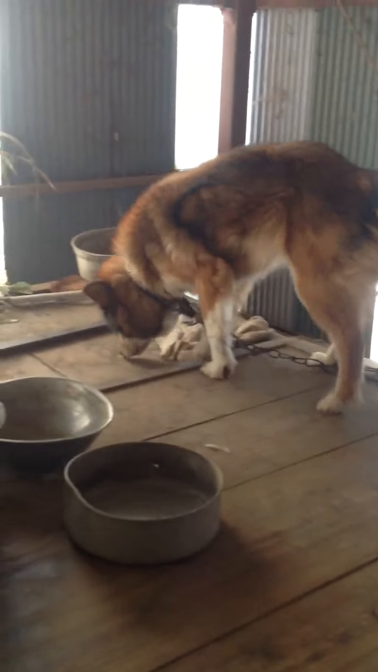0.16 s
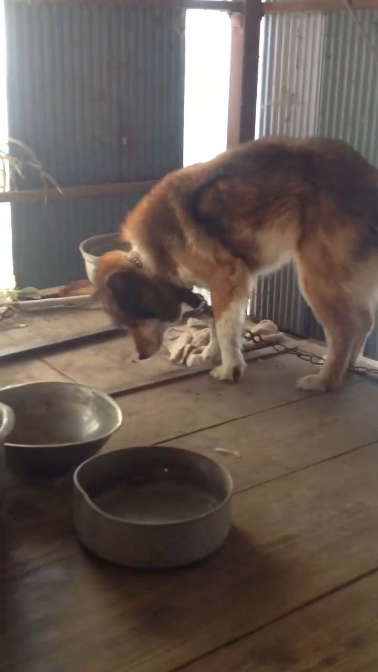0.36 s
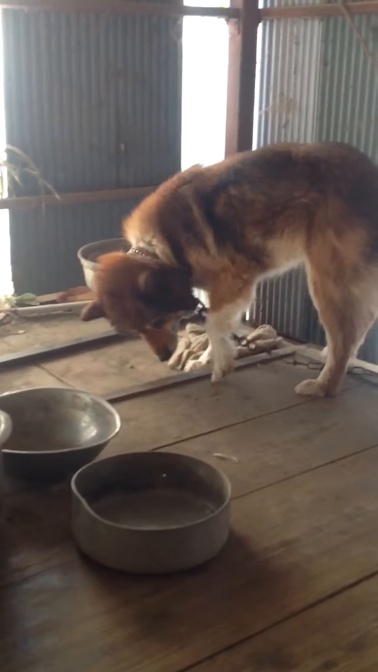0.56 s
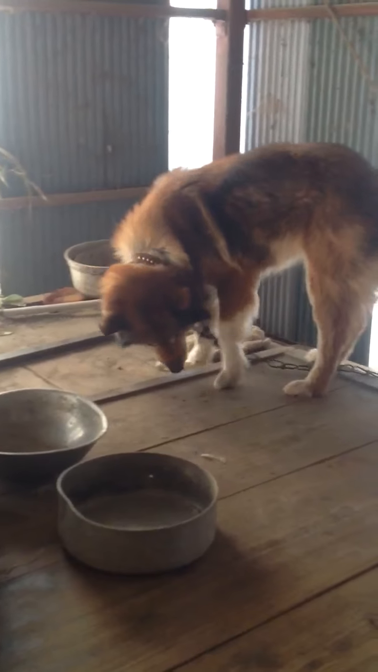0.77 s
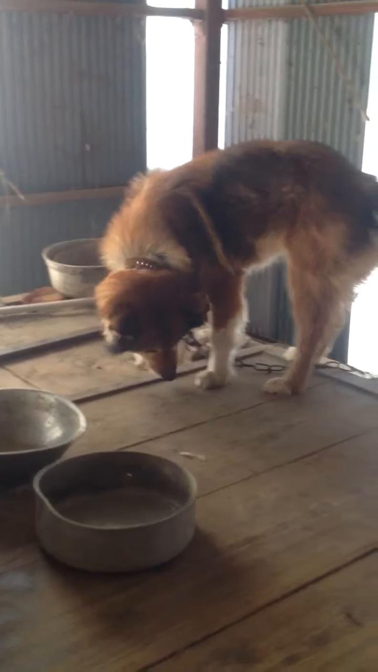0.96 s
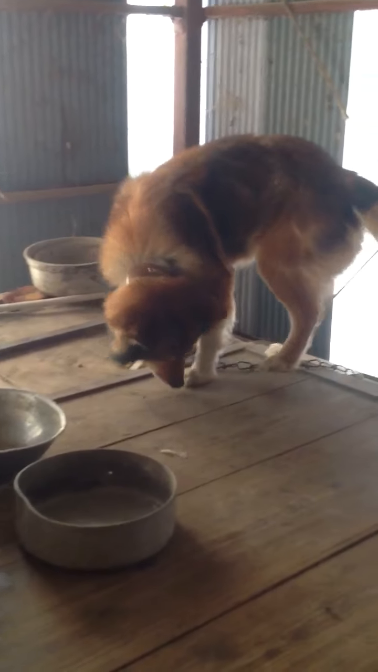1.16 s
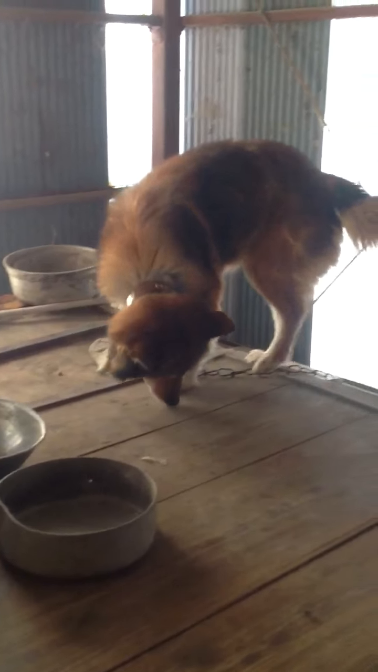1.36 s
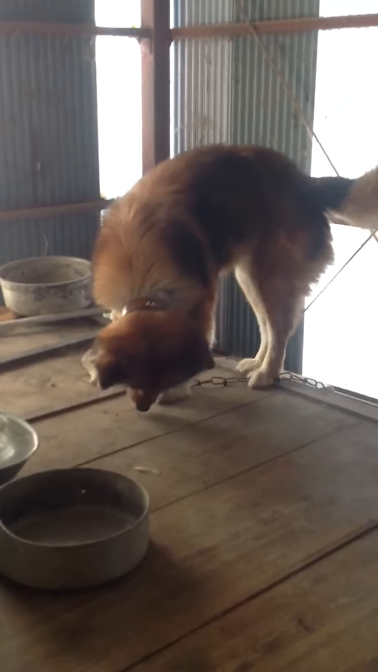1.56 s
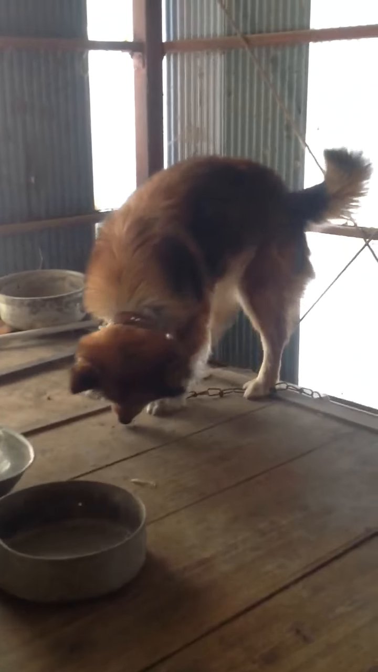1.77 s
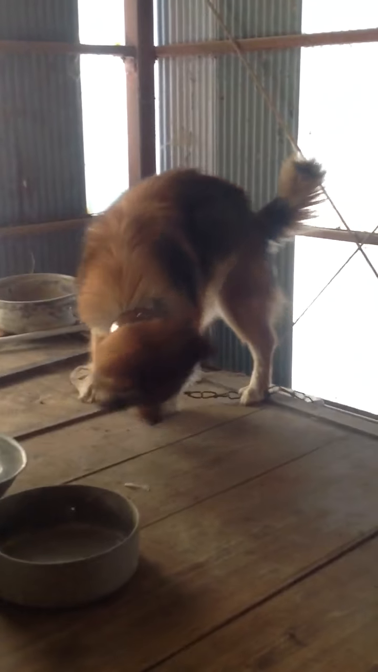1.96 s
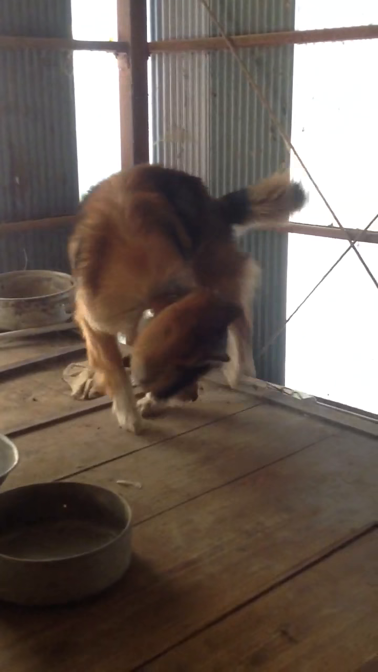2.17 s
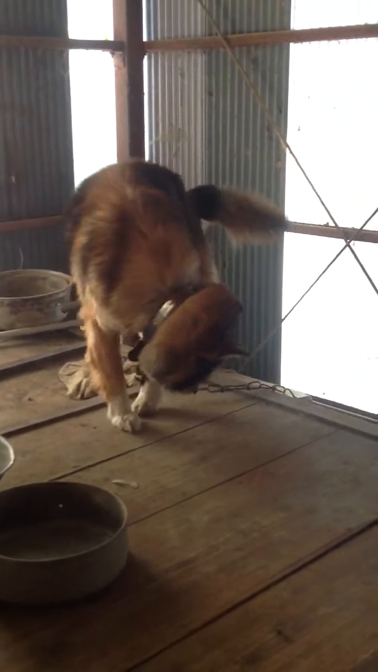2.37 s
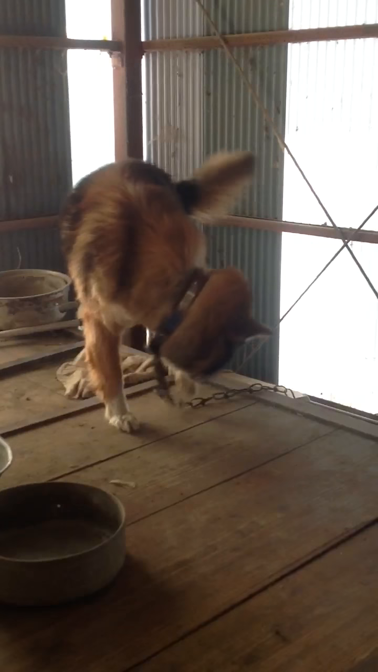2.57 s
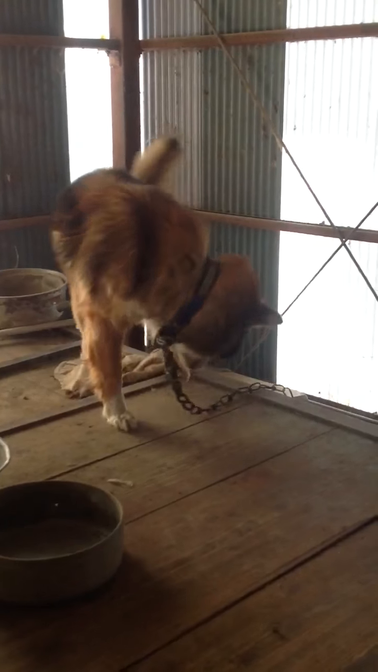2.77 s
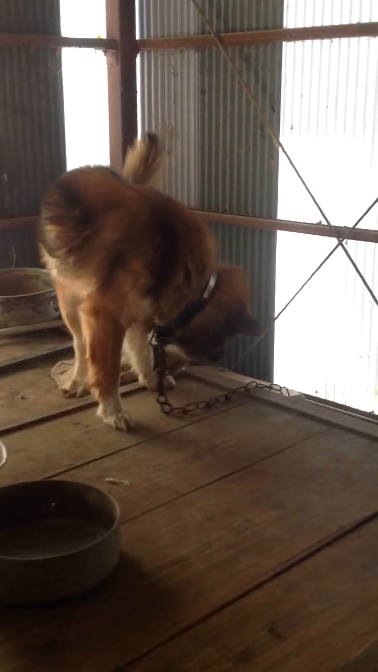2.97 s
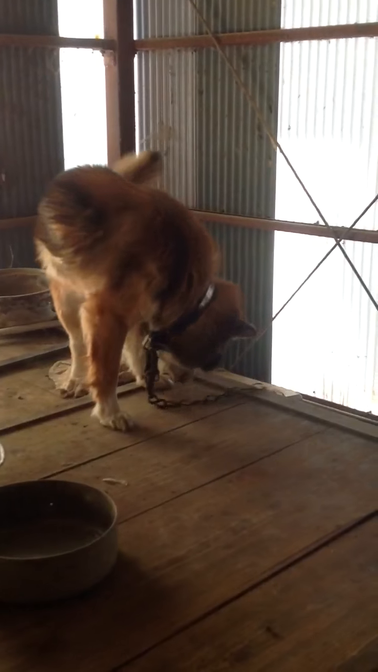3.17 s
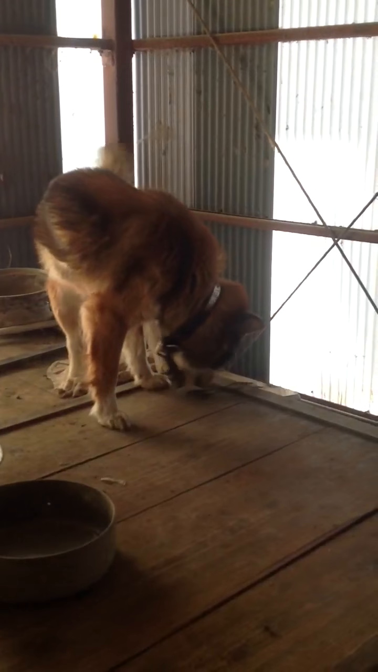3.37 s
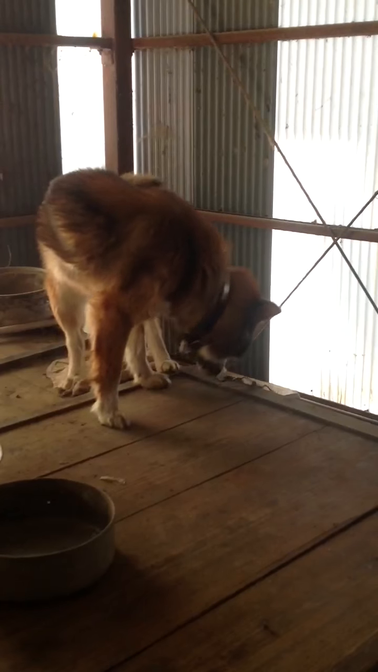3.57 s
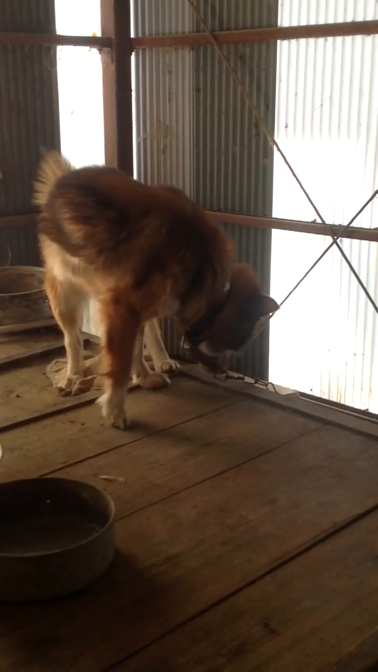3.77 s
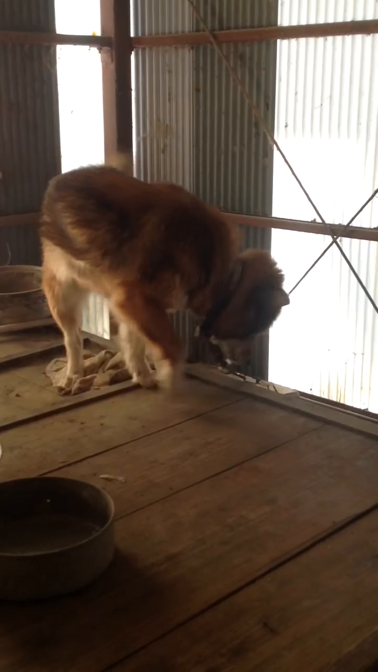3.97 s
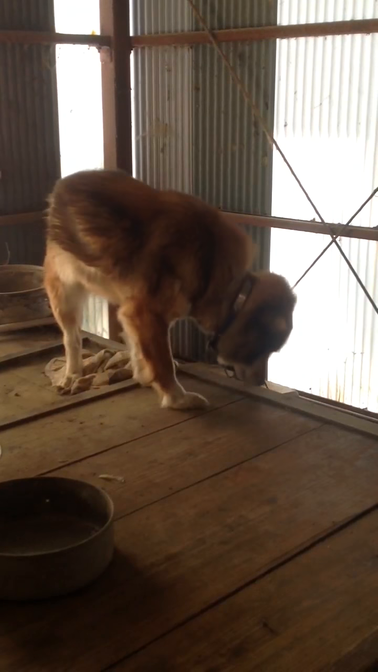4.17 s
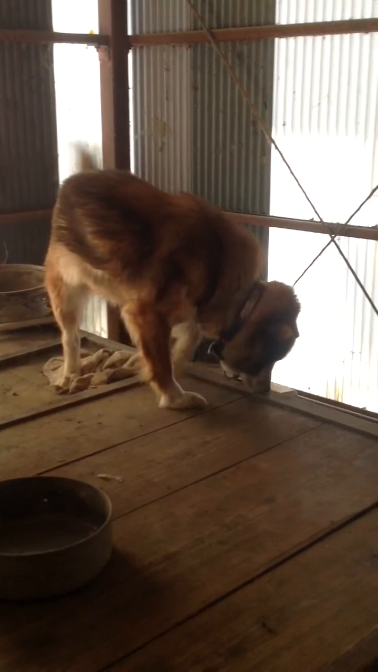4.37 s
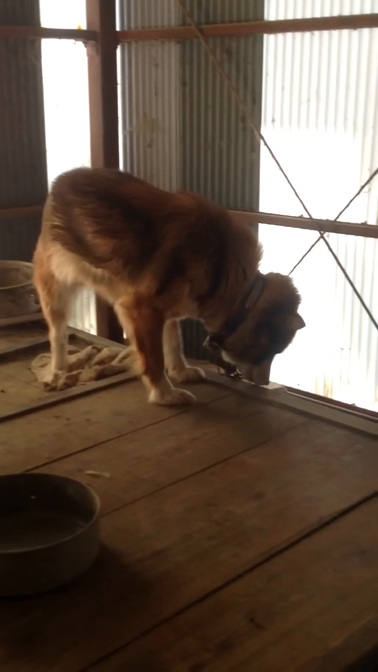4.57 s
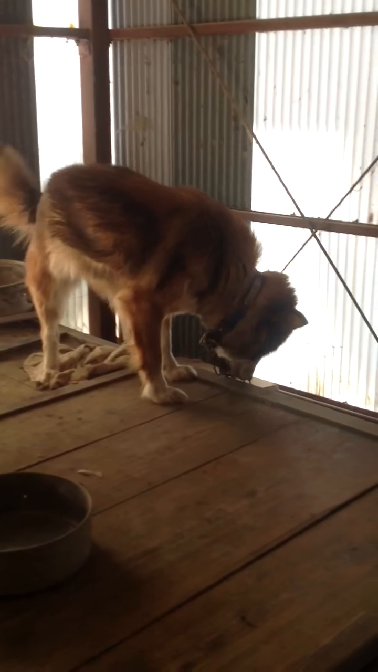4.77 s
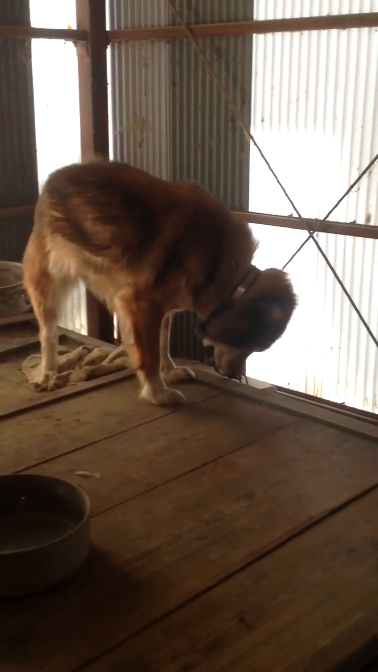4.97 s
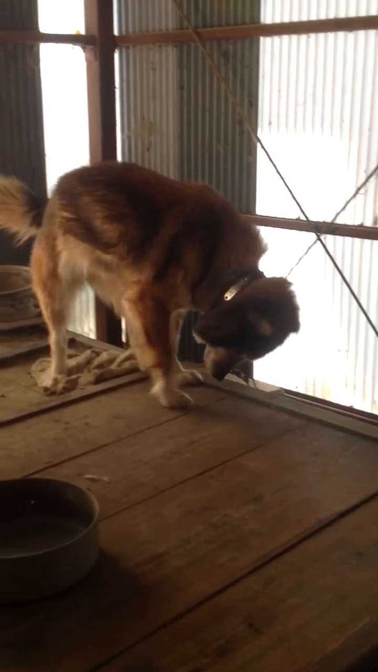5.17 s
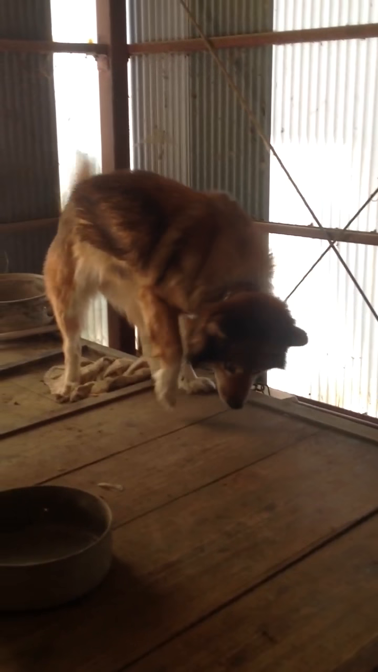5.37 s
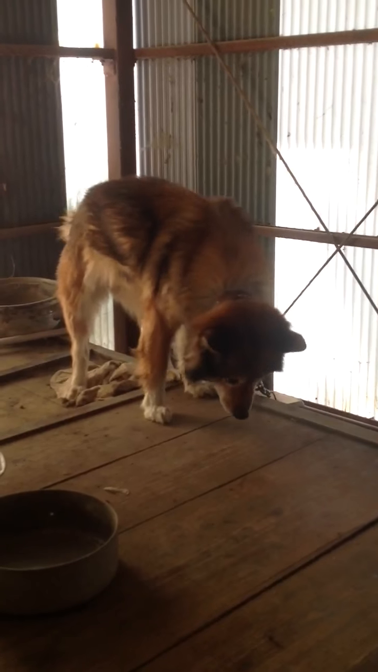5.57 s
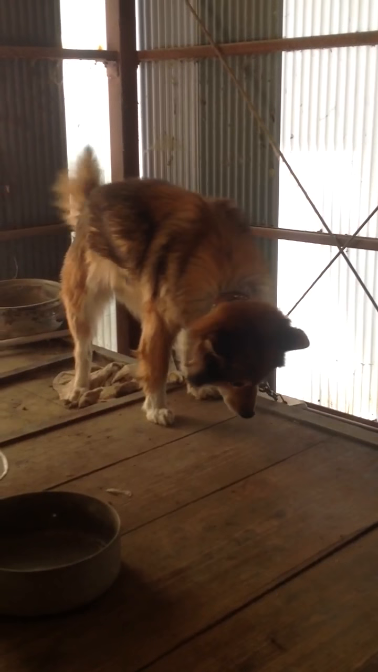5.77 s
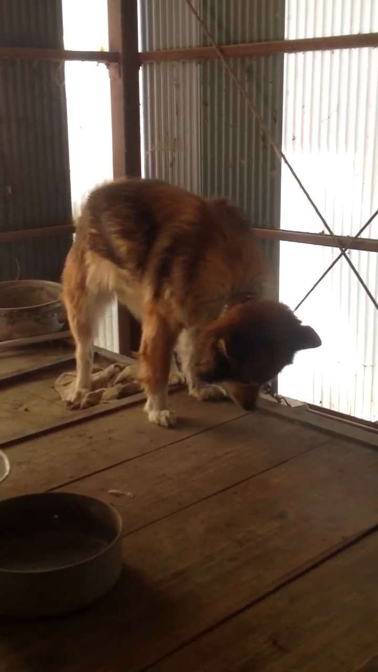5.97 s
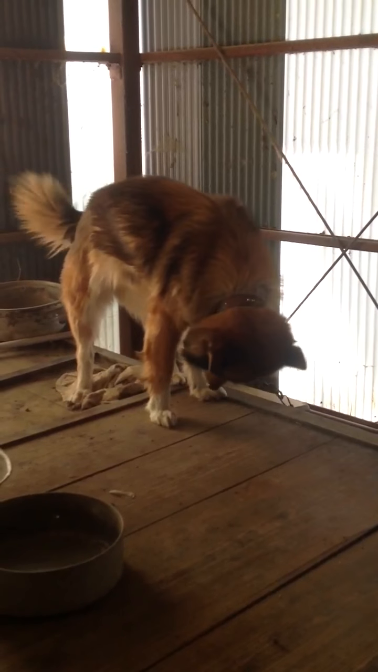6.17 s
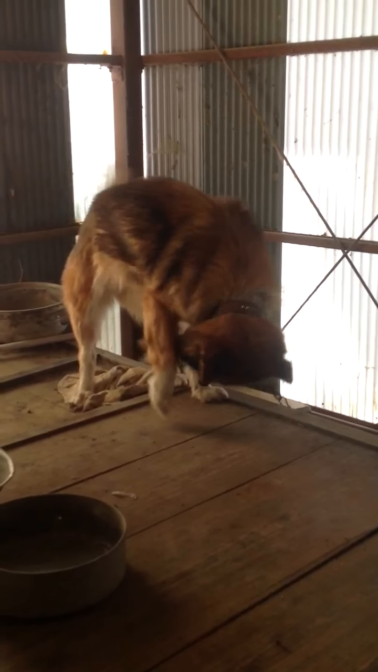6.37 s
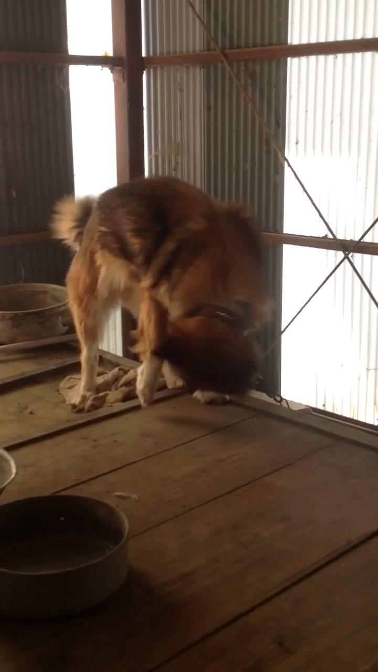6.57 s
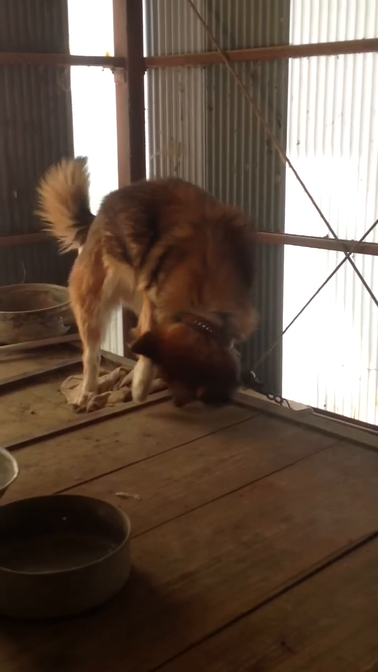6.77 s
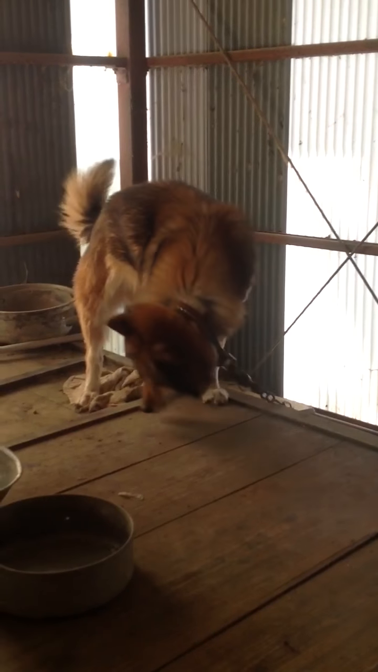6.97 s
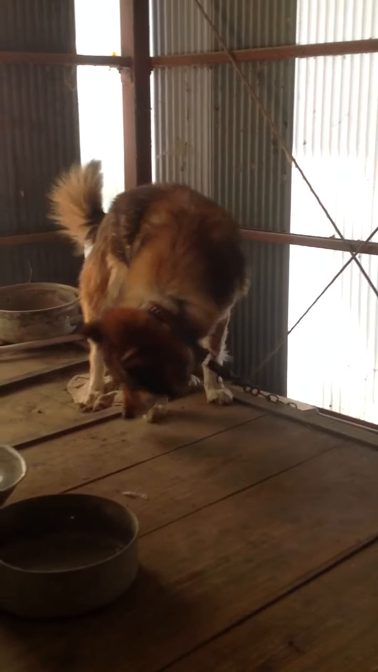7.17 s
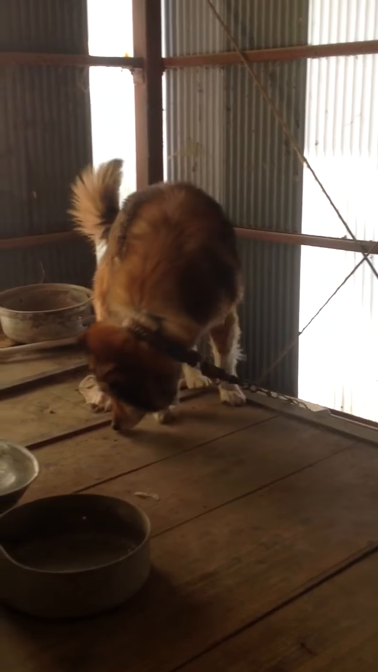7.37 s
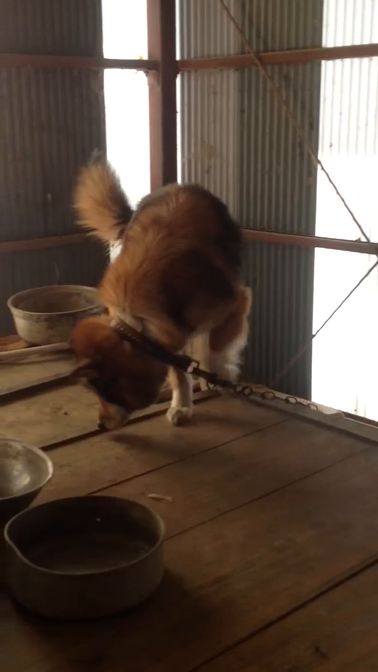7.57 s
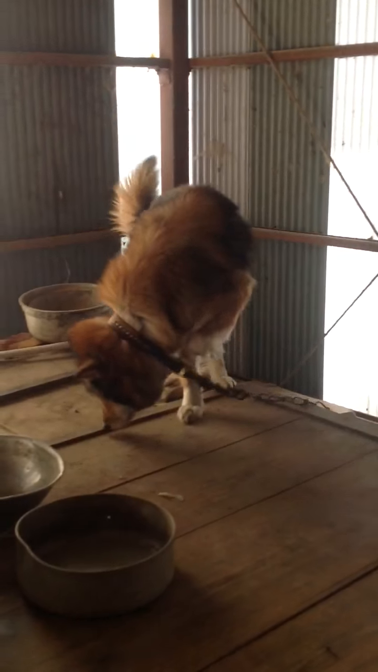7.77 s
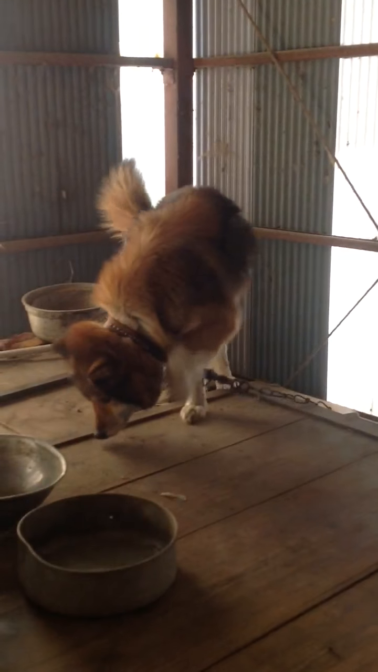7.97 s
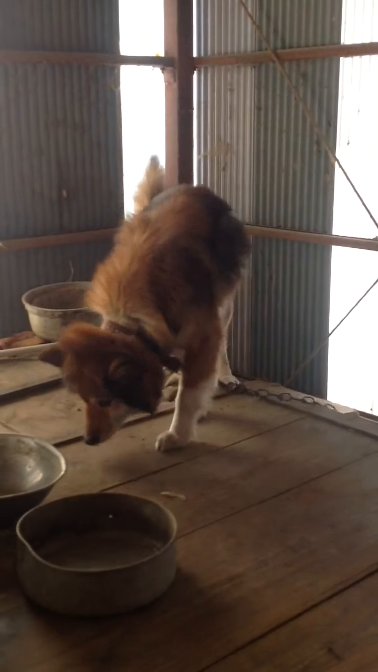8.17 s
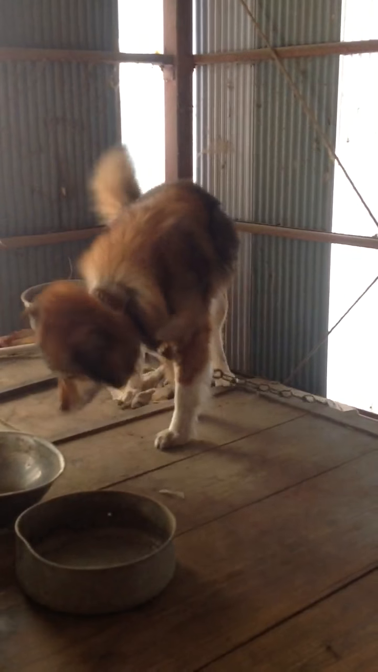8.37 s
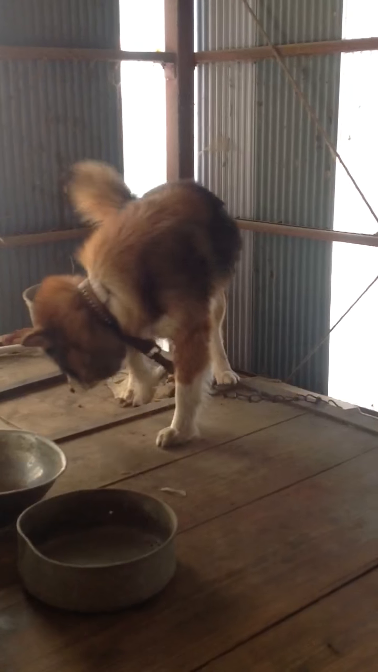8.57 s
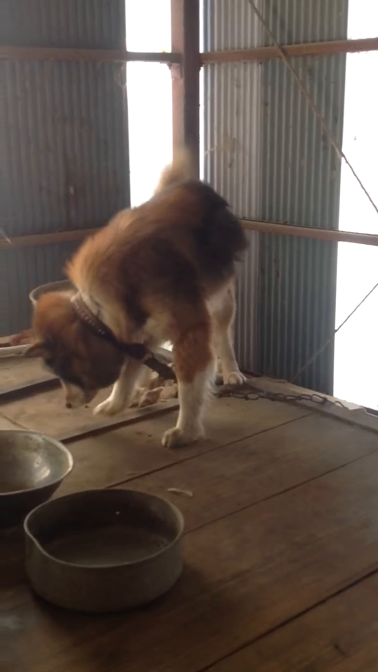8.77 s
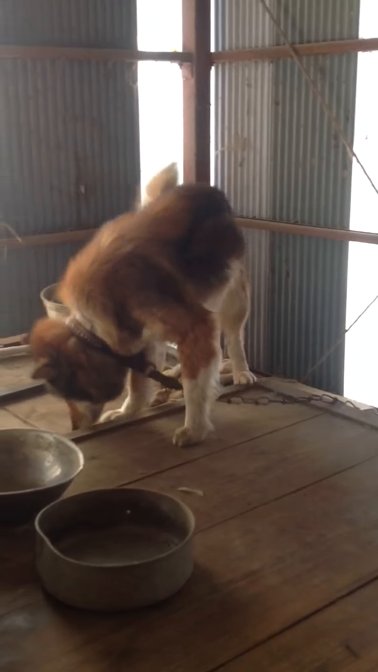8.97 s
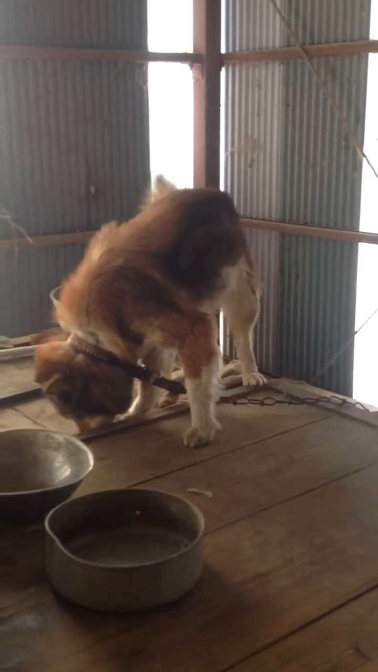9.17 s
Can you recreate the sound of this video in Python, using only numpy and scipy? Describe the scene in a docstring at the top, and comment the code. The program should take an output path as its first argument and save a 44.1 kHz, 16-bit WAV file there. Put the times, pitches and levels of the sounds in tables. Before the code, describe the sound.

A metal chain drags, clinks and knocks over hollow wooden planks in uneven bursts as a dog noses about a tin shed.

```python
"""On the plank floor of a tin shed, a chained dog noses and paws about above a low outdoor rumble.
Slack chain drags in bursts: random contacts shaped into scrape, and nudged links that ring.
Heavy links and claws knock: pulses and noisy rebounds through plank resonances. Links clink: coloured chatter.
Paws scuff over cloth and wood in band-limited noise; the collar ring sings in decaying sines, and one link
squeaks. A short reverberation joins all but the rumble."""
import sys
import numpy as np
from scipy import signal
from scipy.fft import rfft, irfft, next_fast_len
from scipy.io import wavfile

SR = 44100
rng = np.random.default_rng(int(sys.argv[2]) if len(sys.argv) > 2 else 0)


def bounce(signal):
    """Save signal as a 16-bit WAV file at the path given by the first command-line argument."""
    frames = np.transpose(np.atleast_2d(signal))
    limited = np.clip(frames, -1, 1)
    pcm = np.round(limited * 32767).astype(np.int16)
    wavfile.write(sys.argv[1], SR, pcm)


N = 405912  # length in samples


def from_db(db):
    """Decibels to gain."""
    return 10 ** (np.asarray(db) / 20)


def rms_one(x):
    """Scale to unit rms."""
    return x / np.sqrt(np.mean(x ** 2) + 1e-20)


def unit_energy(x):
    """Scale so that the squares sum to one."""
    return x / np.sqrt(np.sum(x ** 2))


def add(track, s, sound):
    """Mix a sound into a track from time s (seconds) on."""
    start = int(np.clip(round(s * SR), 0, N - 1))
    track[start:start + len(sound)] += sound[:N - start]


def band(x, low_hz, high_hz, order=2):
    """Causal band-pass."""
    edges = [low_hz, min(high_hz, .45 * SR)]
    return signal.sosfilt(signal.butter(order, edges, "band", fs=SR, output="sos"), x + 1e-18)


def resonance(x, hz, width_hz):
    """Two-pole resonator with gain 1 at its top."""
    r = np.exp(-np.pi * width_hz / SR)
    numerator = np.array([1, 0, -1]) * (1 - r * r) / 2
    denominator = [1, -2 * r * np.cos(2 * np.pi * hz / SR), r * r]
    return signal.lfilter(numerator, denominator, x)


def coloured(x, spectrum):
    """Give a signal a spectrum with minimum phase, so that nothing sounds early; rms 1."""
    hz, level_db = np.transpose(spectrum)
    size = next_fast_len(N, True) * 2
    grid = np.maximum(np.arange(size // 2 + 1) * SR / size, 1)
    # beyond the table the level falls 20 dB per octave, for two octaves
    outside = np.abs(np.log2(grid / np.clip(grid, hz[0], hz[-1])))
    gain = from_db(np.interp(np.log(grid), np.log(hz), level_db) - 20 * np.minimum(outside, 2))
    # folding the cepstrum onto positive times makes the phase minimal
    cepstrum = irfft(np.log(gain))[:size // 2]
    response = np.exp(2 * rfft(cepstrum, size))
    return rms_one(irfft(rfft(x, size) * response)[:N])


def fade(t60, seconds=.3):
    """Exponential decay at a rate of 60 dB in t60 seconds."""
    return from_db(-60 * np.arange(int(seconds * SR)) / SR / t60)


def burst(t60, rise_s):
    """Noise that swells with time constant rise_s and dies away; unit energy."""
    decay = fade(t60)
    swell = 1 - np.exp(-np.arange(len(decay)) / SR / rise_s)
    return unit_energy(rng.standard_normal(len(decay)) * decay * swell)


def contacts(per_s, spread_db):
    """Random clicks of uneven size and either sign."""
    sizes = from_db(spread_db * np.minimum(rng.exponential(1, N), 3))
    return (rng.random(N) < per_s / SR) * sizes * rng.choice([-1, 1], N)


def link_ring(t60, count=30):
    """One link's ring: high partials that depend on how it hangs; unit energy."""
    decay = fade(t60)
    hz, strength = rng.uniform(4000, 15400, (count, 1)), rng.standard_normal((count, 1))
    partials = strength * np.sin(2 * np.pi * hz * np.arange(len(decay)) / SR)
    return unit_energy(np.sum(partials, axis=0) * decay)


# Spectrum of the outdoor rumble and air. Each row: frequency in Hz, relative level in dB per Hz.
AIR_SPECTRUM = [(18, -62), (30, -37.5), (158, -2.5), (312, -15), (355, -14), (437, -18.5), (2630, -34),
                (3070, -35.5), (9640, -38), (11600, -38), (13200, -40), (15000, -41)]


def outdoor_air(level_db=-54):
    """Steady noise, heaviest in the lows, like distant outdoor rumble."""
    return from_db(level_db) * coloured(rng.standard_normal(N), AIR_SPECTRUM)


# The dog draws the chain over the floor. Each row: start in seconds, length in seconds,
# relative drag on the boards in dB, relative jingle of the links in dB.
CHAIN_PULLS = [(0.0, 0.052, -36, -44.5), (0.123, 0.38, -56, -58), (0.5, 2.3, -60.5, -62.5),
               (0.576, 0.12, -50, -63.5), (0.877, 0.086, -41, -68), (1.516, 0.033, -43.5, -55.5),
               (1.976, 0.019, -45.5, -52), (2.153, 0.024, -44.5, -61), (2.517, 0.23, -41, -56.5),
               (3.003, 0.27, -41.5, -63), (3.243, 0.34, -34.5, -45.5), (3.61, 0.11, -40, -45),
               (3.77, 0.1, -55, -49.5), (3.96, 0.21, -48, -71), (7.02, 0.2, -47, -50.5),
               (7.429, 0.13, -43, -51.5), (7.724, 0.11, -47, -60.5), (8.157, 0.15, -48, -60),
               (8.29, 0.083, -40.5, -46), (8.402, 0.1, -39, -53)]


def drag_levels(attack_s=0.038, release_s=0.046):
    """Gains of drag and jingle: the chain gathers speed, then slides to rest; the strongest pull leads."""
    t, gains = np.arange(N) / SR, np.zeros((2, N))
    for start, length, drag_db, jingle_db in CHAIN_PULLS:
        # the swell leads into the start, the release follows the hold
        early, late = np.maximum(start - t, 0), np.maximum(t - start - length, 0)
        envelope = np.exp(-np.minimum(early / attack_s + late / release_s, 20))
        gains = np.maximum(gains, from_db([[drag_db], [jingle_db]]) * envelope)
    return gains


def jostling(count=14):
    """Each link of the moving chain is nudged at random and answers with a tick and its own ring."""
    out = np.zeros(N)
    for _ in range(count):
        nudges = contacts(per_s=14, spread_db=3)
        answer = link_ring(t60=0.086) + burst(t60=0.035, rise_s=0.00016)
        out += signal.oaconvolve(nudges, answer)[:N]
    return out


# Spectra of links bumping over the grain, grinding on grit and jostling each other.
# Each row: frequency in Hz, relative level in dB per Hz.
BUMP_SPECTRUM = [(90, -36.5), (150, 3), (250, 4), (450, 3), (800, -2.5), (1100, -21), (1600, -29.5)]
SCRAPE_SPECTRUM = [(600, 16.5), (1000, 12.5), (1700, 4.5), (3000, -4), (3800, -10), (5500, -9), (9000, -21)]
JINGLE_SPECTRUM = [(3000, 7), (4800, 2.5), (7500, -2), (11000, 1), (13000, -2), (15500, -3)]


def dragging(rumble_db=-5, scrape_db=0, jingle_db=-1, grind_share=0.32):
    """Links bump over the grain, grind on grit and jostle each other; returns the wood's and the metal's part."""
    drag, jingle = drag_levels()
    # the scrape partly follows the jingle instead of the drag
    grind = drag ** (1 - grind_share) * jingle ** grind_share
    bumps = contacts(per_s=240, spread_db=3)
    grit = bumps + .35 * contacts(per_s=1200, spread_db=3)
    rumble = from_db(rumble_db) * drag * coloured(bumps, BUMP_SPECTRUM)
    scrape = from_db(scrape_db) * grind * coloured(grit, SCRAPE_SPECTRUM)
    metal = from_db(jingle_db) * jingle * coloured(jostling(), JINGLE_SPECTRUM)
    return rumble + scrape, metal


# Links and claws landing on the boards. Each row: start in seconds, relative strength in dB,
# hardness as crack over thud in dB, pitch of the struck spot in Hz.
BOARD_KNOCKS = [(0.003, -27, 0.5, 267), (0.056, -25, 3, 360), (0.368, -35, 17, 1690),
                (0.786, -40.5, 8, 1170), (0.873, -23, -28, 585), (1.058, -32, -10, 406),
                (1.147, -41.5, -30, 574), (1.298, -34, -7.5, 542), (1.473, -28.5, 5, 1790),
                (1.547, -38, 10, 400), (1.953, -35, 13, 3500), (1.974, -33.5, -0.5, 408),
                (2.222, -39.5, 16, 2400), (2.287, -31.5, -5.5, 1170), (2.378, -39, 25, 2680),
                (2.474, -34, 5.5, 820), (2.519, -26.5, -4.5, 1160), (2.587, -21.5, -9.5, 410),
                (2.675, -33, -8, 410), (2.727, -29, -9, 414), (2.919, -29.5, -4.5, 430),
                (3.018, -25.5, -8, 445), (3.073, -28.5, -4, 416), (3.090, -27.5, 7, 403),
                (3.205, -30, 2.5, 406), (3.293, -23.5, -1, 775), (3.347, -24, -0.5, 404),
                (3.401, -21, 2.5, 820), (3.450, -27, 18, 3100), (3.456, -24.5, 6, 3040),
                (3.556, -26, -2, 330), (3.587, -26.5, 9, 2700), (4.082, -34.5, -7, 730),
                (4.139, -38, -16, 700), (4.188, -33.5, 3, 1800), (4.416, -42.5, -16, 825),
                (4.554, -39.5, 10, 2700), (5.366, -34, 7.5, 1290), (6.439, -41, -24, 252),
                (6.738, -41.5, -1, 570), (6.755, -36.5, 1.5, 580), (6.860, -39.5, 0, 1360),
                (6.969, -36.5, 4, 2306), (6.982, -31, 9, 1800), (7.046, -33, -24, 860),
                (7.092, -31.5, 4, 328), (7.171, -29.5, 12, 2140), (7.340, -44, 18, 3430),
                (7.434, -34, 2.5, 340), (7.500, -31.5, -3, 325), (7.525, -26.5, 9, 2130),
                (7.727, -40.5, -9, 796), (7.805, -44.5, 2, 1750), (8.126, -36, 19, 2436),
                (8.157, -31, 9, 2250), (8.253, -32, 1, 885), (8.310, -23.5, 13, 860), (8.333, -28, 0, 870),
                (8.362, -23, 21, 1780), (8.441, -36.5, -6, 850)]


def landings(loose_per_s=9, loose_db=1.5, loose_hardness_db=9.5):
    """The main blows, and those of links that tip over on any spot during each pull."""
    rows = list(BOARD_KNOCKS)
    for start, length, drag_db, _ in CHAIN_PULLS:
        waits = np.cumsum(rng.exponential(1 / loose_per_s, 8))
        sizes_db, hardnesses_db = rng.normal(0, 3, (2, 8))
        spots_hz = 400 * 2 ** rng.uniform(0, 3, 8)
        for wait, size_db, hardness_db, hz in zip(waits, sizes_db, hardnesses_db, spots_hz):
            if wait < length:
                strength_db = drag_db + loose_db + size_db
                rows.append((start + wait, strength_db, loose_hardness_db + hardness_db, hz))
    return rows


def knocks(thud_db=-2, clack_db=-4, tick_db=0, snap_db=-16, weight_db=-21,
           rebound_base_db=1.56, skitter_db_per_db=0.1536, typical_knock_db=-23.5, rebound_t60=0.12,
           hard_share=0.57, tick_per_hardness=0.087, spot_db=4, spot_rise_db_per_octave=3,
           overtone_db=-6, spot_q=8, thud_lag_s=0.00042):
    """Each blow is a sharp pulse followed by rebounds; every spot on the planks has its own resonances."""
    thud, clack, tick = np.zeros((3, N))
    for s, strength_db, hardness_db, spot_hz in landings():
        # a hard contact loses thud, a soft one loses crack, its tick most of all
        thud_level, crack_level = strength_db - max(hardness_db, 0), strength_db + min(hardness_db, 0)
        # light blows skitter more
        rebound_db = rebound_base_db + skitter_db_per_db * (typical_knock_db - strength_db)
        rebounds = from_db(rebound_db) * burst(rebound_t60, rise_s=0.00098)
        pulse = signal.unit_impulse(len(rebounds)) * from_db(-rebound_db)
        others_hz = np.array([400, 800, 1500]) * 2 ** rng.uniform(-.5, .5, 3)
        # a stiffer, higher spot rings out more
        spot_gain = from_db(spot_db + spot_rise_db_per_octave * np.log2(min(spot_hz, 1400) / 1000))
        # rebounds are softer, so they carry less of the tick
        blow = np.array([pulse + rebounds, pulse + hard_share * rebounds])
        spot = spot_gain * resonance(blow, spot_hz, spot_hz / spot_q)
        overtones = from_db(overtone_db) * sum(resonance(blow, hz, hz / spot_q) for hz in others_hz)
        full, sharp = blow + spot + overtones
        # low bending waves travel slowest along a plank
        add(thud, s + thud_lag_s, from_db(thud_level + thud_db) * full)
        add(clack, s, from_db(crack_level + clack_db) * full)
        add(tick, s, from_db(crack_level + tick_db + tick_per_hardness * hardness_db) * sharp)
    weight = from_db(weight_db) * band(thud, low_hz=128, high_hz=270)
    snap = from_db(snap_db) * band(tick, low_hz=4430, high_hz=6300)
    # a narrow band spreads a pulse out, so it needs more drive for the same height
    low = (band(thud, low_hz=224, high_hz=871, order=3) + weight) * SR / 900
    middle = band(clack, low_hz=871, high_hz=2100, order=3) * SR / 1600
    high = (band(tick, low_hz=2030, high_hz=3425, order=3) + snap) * SR / 2200
    return low + middle + high


# Floorboard resonances. Each row: frequency in Hz, width in Hz, level in dB over the force.
FLOORBOARD_MODES = [(178.3, 39, 7), (251, 5.3, 4), (337.7, 34, 3), (400.4, 24, 1.5), (545.5, 42, 1),
                    (658, 13, -10), (816, 17, -4), (1692, 43, -1.5), (2430, 150, 2), (3070, 73, -12)]


def floorboards(force, hollow_hz=1300, hollow_width_hz=380, hollow_share=0.17):
    """The planks pass the force on, ring at their modes and radiate poorly between thud and clack."""
    out = force - hollow_share * resonance(force, hollow_hz, hollow_width_hz)
    for hz, width_hz, level_db in FLOORBOARD_MODES:
        out = out + from_db(level_db) * resonance(force, hz, width_hz)
    return out


# Link against link. Each row: start in seconds, relative strength in dB,
# brightness as treble over lower ring in dB.
LINK_CLINKS = [(0.003, -43, -16), (0.148, -41.5, -3), (0.228, -42.5, 3), (0.407, -43, -8), (0.821, -39, -1),
               (1.118, -51.5, 8), (1.580, -46, -3), (2.086, -42, -2), (2.222, -43, -14.5), (2.377, -45, -9),
               (2.520, -50, 19), (2.643, -43, -1), (2.689, -40.5, -1), (2.908, -50, 0), (3.001, -42, 7),
               (3.283, -46, 4), (3.346, -41, 12), (3.782, -41.5, 1), (4.078, -49.5, 3), (4.175, -51, 5),
               (4.287, -54, 0), (4.583, -44.5, -1), (4.665, -55, -1), (4.749, -48.5, 6), (5.185, -48.5, -2),
               (5.206, -41.5, 8), (5.280, -48, 1), (5.514, -50, 6), (5.592, -54.5, -1), (6.290, -55, 2),
               (6.523, -58, 4), (6.787, -47, 3), (6.984, -42.5, 0), (7.523, -43.5, -2), (7.735, -47, -6),
               (8.252, -49, 9), (8.367, -46, 6), (8.520, -43.5, 4), (8.588, -47, 2), (8.702, -47.5, -9),
               (8.981, -54.5, 4)]


def clinks(treble_db=24, lower_db=24, ring_share=0.2, chatter_t60=0.24, strays_per_s=1.2, stray_db=-55.5):
    """Two links chatter briefly; each pair colours the chatter its own way and leaves a damped ring."""
    treble, lower = np.zeros((2, N))
    # faint touches in the hanging chain
    stray_times = np.flatnonzero(rng.random(N) < strays_per_s / SR) / SR
    strays = [(s, stray_db, 0) for s in stray_times]
    for s, strength_db, bright_db in LINK_CLINKS + strays:
        chatter = burst(chatter_t60, rise_s=.0006) + .7 * burst(t60=.02, rise_s=.0002)
        colour = link_ring(t60=.007, count=36)
        pair = signal.fftconvolve(chatter, colour)[:len(chatter)]
        touch = chatter + 1.01 * pair + ring_share * link_ring(t60=0.12)
        add(treble, s, from_db(strength_db + bright_db / 2 + treble_db) * touch)
        add(lower, s, from_db(strength_db - bright_db / 2 + lower_db) * touch)
    return band(treble, low_hz=9370, high_hz=14300) - band(lower, low_hz=1760, high_hz=6670)


# Short rasps over cloth and wood. Each row: start in seconds, relative strength in dB,
# brightness as hiss over body in dB.
PAW_SCUFFS = [(0.004, -32.5, -10), (0.333, -40, 5), (0.513, -36.5, -4), (0.581, -41.5, -12),
              (0.846, -39.5, -17), (0.941, -44, 4), (1.678, -43.5, -6), (1.829, -33.5, -2), (3.732, -34, 2),
              (3.789, -32, -11), (3.987, -44.5, -8), (4.100, -42, -7), (4.523, -47.5, -7), (5.515, -46, -8),
              (5.583, -54, -25)]


def scuffs(hiss_db=30, body_db=32):
    """A quick swipe: friction noise that starts almost at once and trails off."""
    hiss, body = np.zeros((2, N))
    for s, strength_db, bright_db in PAW_SCUFFS:
        swipe = burst(t60=0.24, rise_s=0.00056)
        add(hiss, s, from_db(strength_db + bright_db / 2 + hiss_db) * swipe)
        add(body, s, from_db(strength_db - bright_db / 2 + body_db) * swipe)
    return band(hiss, low_hz=3500, high_hz=7070) - band(body, low_hz=940, high_hz=2650)


# Blows on the collar ring. Each row: start in seconds, relative level in dB.
COLLAR_BLOWS = [(0.23, -49), (3.359, -35.5), (4.749, -58), (5.200, -43.5), (7.094, -46), (7.447, -59),
                (8.332, -54), (8.471, -53)]
# Modes of the steel ring. Each row: frequency in Hz, mean relative level in dB, t60 in seconds.
COLLAR_MODES = [(7025, -14, .15), (7558, -13, .2), (7845, -12, .4), (8970, -10, .25), (9675, -3, .18),
                (10238, -6, .12), (11360, -12, .1)]


def collar_ring():
    """The free-hanging steel ring sings on, with a new mix of its modes at each blow."""
    out = np.zeros(N)
    for s, blow_db in COLLAR_BLOWS:
        for hz, level_db, t60 in COLLAR_MODES:
            decay = fade(t60) * from_db(rng.uniform(-3, 3))
            tone = np.sin(2 * np.pi * hz * np.arange(len(decay)) / SR)
            add(out, s, from_db(blow_db + level_db) * decay * tone)
    return out


# A link twisting under load squeaks once. The row: start in seconds, frequency in Hz, relative level in dB.
LINK_SQUEAK = (1.790, 600, -41)


def squeak(length_s=0.029):
    """Steel sticks and slips evenly for a moment: a short, nearly pure note."""
    s, hz, level_db = LINK_SQUEAK
    t = np.arange(int(length_s * SR)) / SR
    swell = np.sin(np.pi * t / length_s)
    out = np.zeros(N)
    add(out, s, from_db(level_db) * swell * np.sin(2 * np.pi * hz * t))
    return out


def shed(x, low_db=-7, middle_db=-9, high_db=-8):
    """Short reverberation between tin walls: three bands of decaying noise, shortest in the highs."""
    response = from_db(low_db) * band(burst(t60=0.23, rise_s=0.0043), low_hz=105, high_hz=850)
    response += from_db(middle_db) * band(burst(t60=0.47, rise_s=0.0011), low_hz=714, high_hz=3430)
    response += from_db(high_db) * band(burst(t60=0.072, rise_s=0.0009), low_hz=4300, high_hz=15700)
    return x + signal.oaconvolve(x, response)[:N]


def scene():
    """Wood, metal and scuffs sound in the shed, over the steady air."""
    drag_wood, drag_metal = dragging()
    wood = floorboards(knocks() + drag_wood)
    metal = drag_metal + clinks() + collar_ring() + squeak()
    return (shed(wood + metal + scuffs()) + outdoor_air())[None]


def record(dry, cutoff_hz=15400):
    """The small microphone thins the deep bass; the top is cut steeply."""
    thin = signal.sosfilt(signal.butter(1, 60, "high", fs=SR, output="sos"), dry)
    return signal.sosfilt(signal.ellip(12, .1, 80, cutoff_hz, fs=SR, output="sos"), thin)


dry = scene()
out = record(dry)
bounce(out)
```